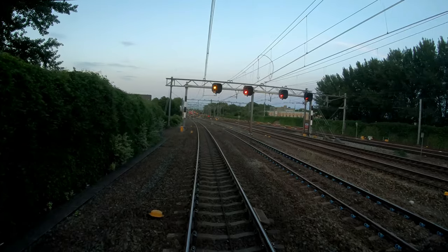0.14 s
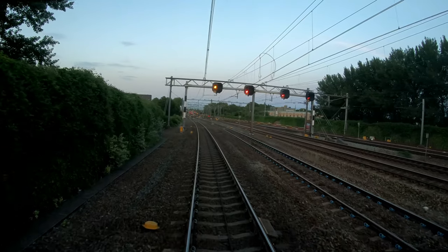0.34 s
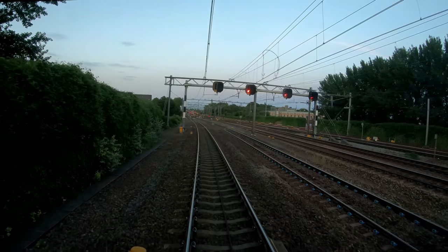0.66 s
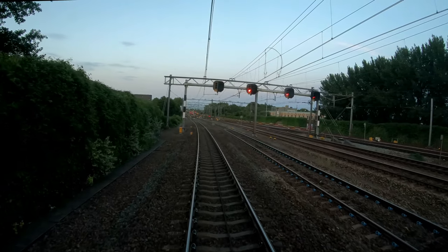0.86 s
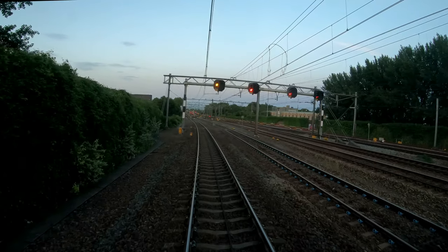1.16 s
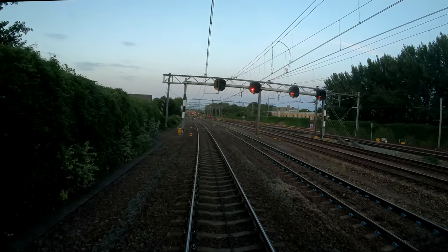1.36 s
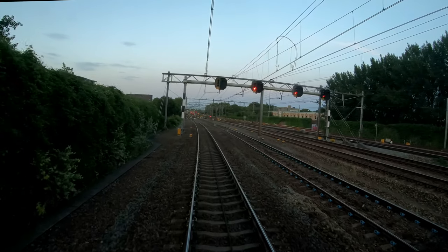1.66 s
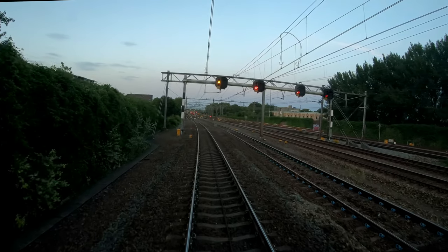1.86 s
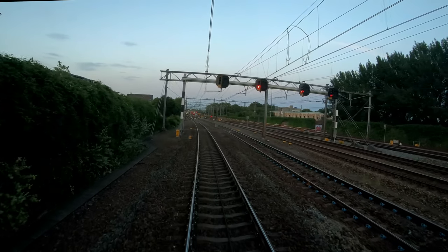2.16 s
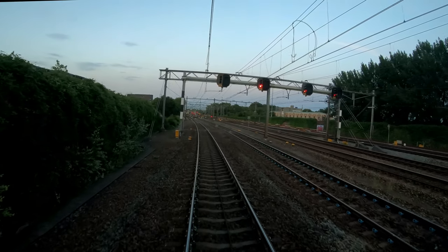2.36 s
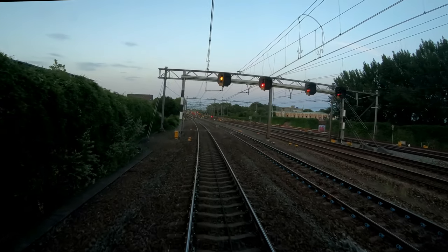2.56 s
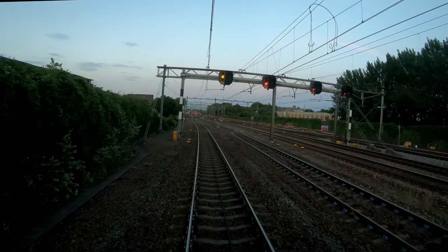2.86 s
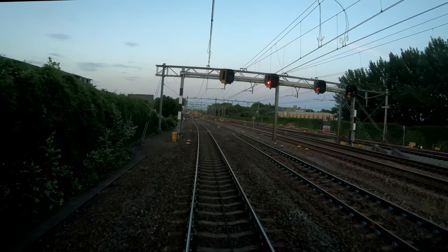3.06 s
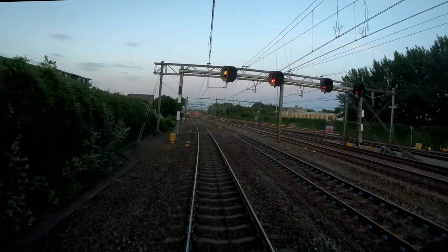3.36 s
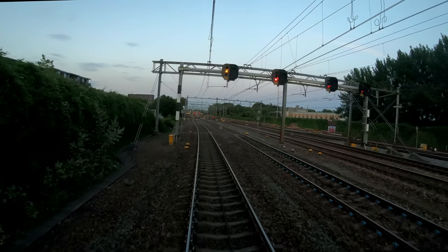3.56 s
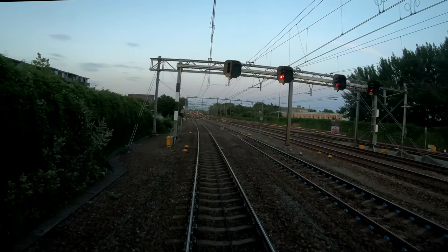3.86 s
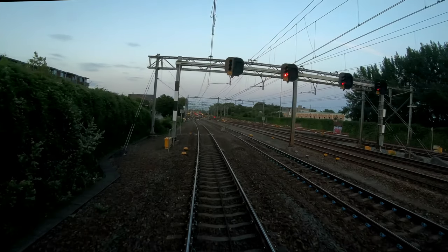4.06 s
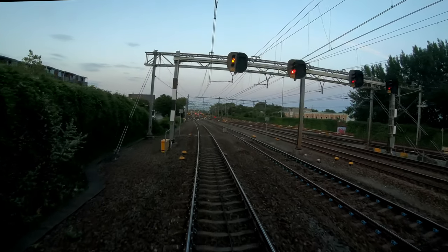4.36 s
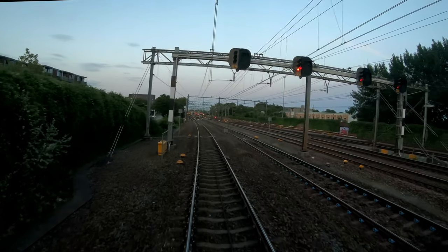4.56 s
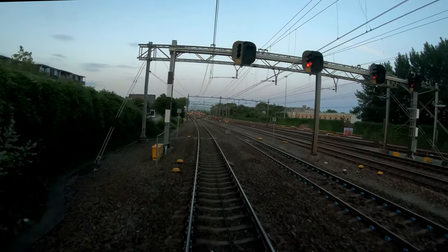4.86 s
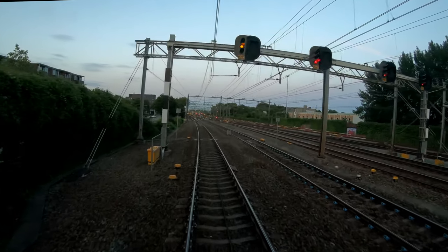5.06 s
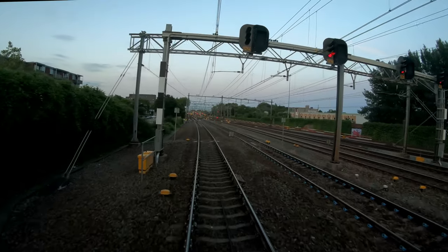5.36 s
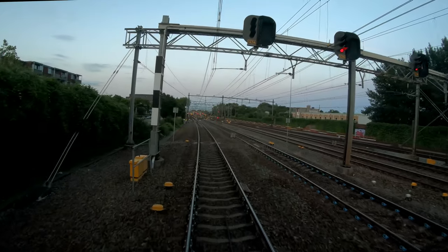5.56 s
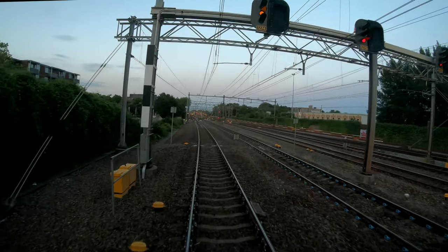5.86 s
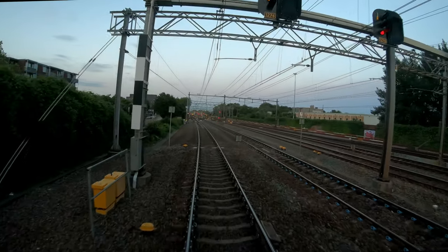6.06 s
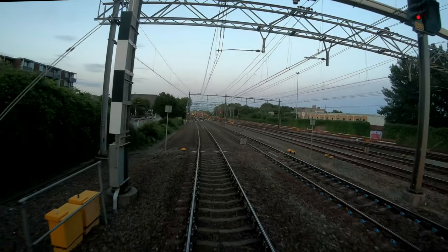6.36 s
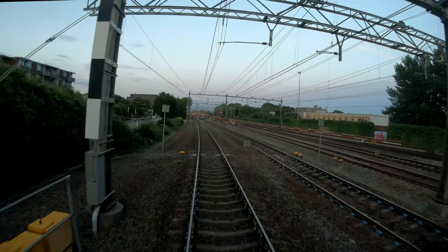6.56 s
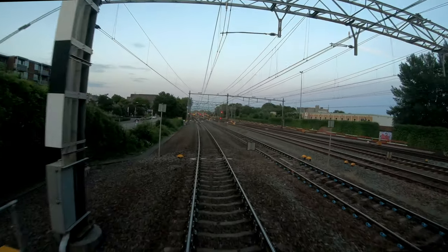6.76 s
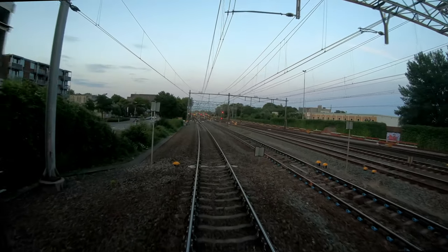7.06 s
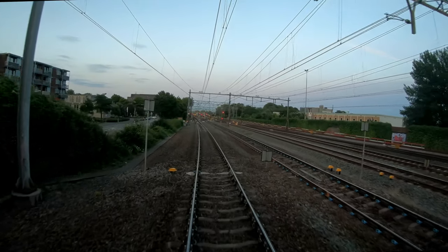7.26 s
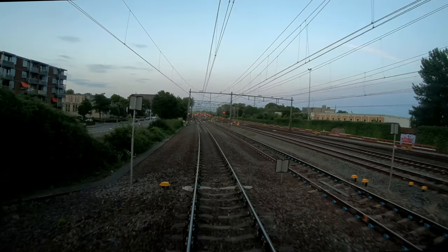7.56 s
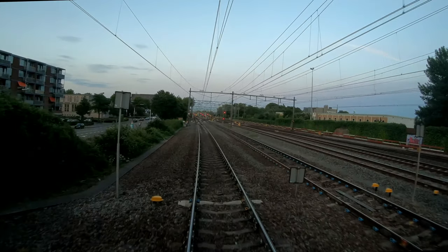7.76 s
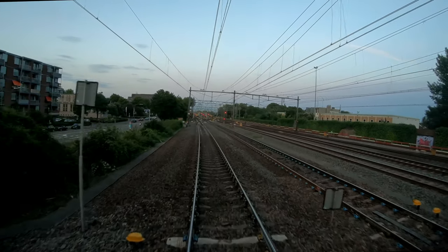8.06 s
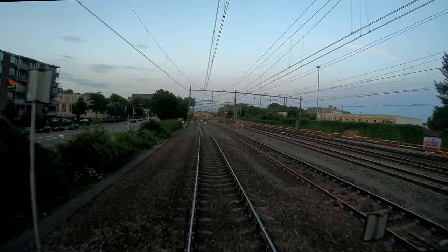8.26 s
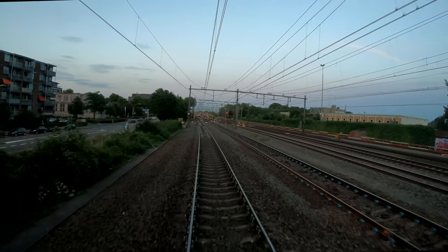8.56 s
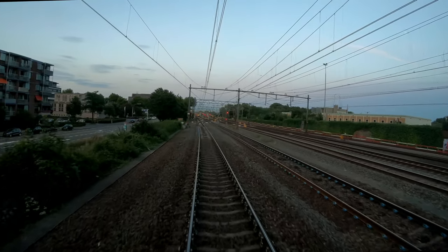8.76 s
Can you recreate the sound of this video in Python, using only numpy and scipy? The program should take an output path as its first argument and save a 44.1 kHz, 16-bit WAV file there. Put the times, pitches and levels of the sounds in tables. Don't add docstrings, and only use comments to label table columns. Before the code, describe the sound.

Close stereo inside a moving train's cab: a deep, wavering rumble with boomy lurches runs throughout. Early on, compressed air blows off twice, the second sharper, with a faint metallic ring and tiny squeaks, followed by four very quiet whistling puffs. The rolling then strengthens gradually, with frequent low bumps, brief panel hums, faint rising gear tones, a steady thin whine, tiny clicks and a heavy soft thud near the end.

```python
import sys
import numpy as np
from scipy import signal
from scipy.fft import rfft, irfft, next_fast_len
from scipy.io import wavfile
from scipy.ndimage import uniform_filter1d

SR = 44100
rng = np.random.default_rng(int(sys.argv[2]) if len(sys.argv) > 2 else 0)


def unload_wav(signal):
    wavfile.write(
        sys.argv[1],
        SR,
        np.round(np.clip(np.atleast_2d(signal).T, -1, 1) * 32767).astype(np.int16),
    )


def how_loud(loudness_db):
    steps = np.asarray(loudness_db, float) / 20
    return 10 ** steps


N = 393372
T = np.arange(N) / SR
SLOW = T[::64]
HZ = np.maximum(np.fft.rfftfreq(next_fast_len(N), 1 / SR), 1)
MESH_HZ = 179.2 + 24.4 * T
DOUBLINGS = np.log2(MESH_HZ / 300)

# frequency_hz, density_db (per Hz)
RUMBLE = [(8.8, -58.5), (15, -26.5), (47, -6), (65, 4.5), (76, -4), (91, -9), (114, -6), (149, -9.5),
          (170, -17), (191, -13), (215, -19), (258, -21), (298, -35), (340, -34), (440, -65.5), (750, -120)]
# frequency_hz, width_hz, lift_db
RUMBLE_PEAKS = [(88.3, 4.2, -7.5), (93.8, 8.5, 3.5), (112.4, 10, 5), (122.1, 9.2, -4), (151.7, 7.3, 5),
                (184, 8.6, 3.5), (212.4, 11, 4.5), (277, 20, 4.5)]
# time_s, pitch_hz
SLEEPERS = [(0, 57.03), (.75, 62), (1.6, 53.7), (2.5, 50.35), (3.5, 58), (5.3, 63.63), (6.5, 67.84),
            (8.1, 65.81), (8.92, 68.76)]
# time_s, level_db
RAIL = [(0.0, -37.5), (0.52, -28.5), (0.74, -40), (1.49, -43.5), (2.85, -35), (3.53, -36.5), (3.72, -34),
        (4.94, -33), (5.17, -42.5), (5.42, -39), (5.54, -32.5), (6.04, -38.5), (6.21, -35), (6.56, -32.5),
        (6.9, -33), (7.18, -35), (7.53, -34.5), (8.92, -32)]
# peak_s, level_db, rise_s, fall_s
SURGES = [(0.433, -27.5, 0.06, 0.012), (0.535, -37, 0.03, 0.013), (0.713, -21.5, 0.031, 0.036),
          (0.954, -29.5, 0.052, 0.025), (1.211, -30, 0.053, 0.042), (1.919, -29.5, 0.026, 0.021),
          (2.35, -34, 0.038, 0.027), (2.779, -31.5, 0.021, 0.087), (3.651, -27, 0.022, 0.019),
          (3.801, -30.5, 0.03, 0.055), (4.231, -26, 0.04, 0.05), (4.339, -26, 0.028, 0.017),
          (4.462, -26.5, 0.045, 0.017), (4.586, -29, 0.03, 0.035), (4.746, -25.5, 0.036, 0.021),
          (4.922, -26.5, 0.014, 0.031), (5.026, -19, 0.025, 0.025), (5.375, -27.5, 0.02, 0.026),
          (5.556, -34.5, 0.043, 0.034), (5.773, -23.5, 0.028, 0.027), (6.094, -24, 0.063, 0.057),
          (6.613, -30.5, 0.037, 0.035), (6.773, -20, 0.021, 0.03), (7.081, -25, 0.055, 0.038),
          (7.325, -20.5, 0.023, 0.086), (7.641, -16.5, 0.034, 0.039), (7.748, -23, 0.038, 0.039),
          (8.151, -29.5, 0.067, 0.052), (8.339, -24, 0.014, 0.02), (8.639, -26.5, 0.013, 0.023)]
# peak_s, level_db, rise_s, fall_s
LURCHES = [(0.221, -42, 0.047, 0.044), (0.969, -35, 0.053, 0.14), (2.633, -36.5, 0.071, 0.065),
           (3.435, -36.5, 0.04, 0.042), (3.763, -39, 0.048, 0.041), (4.328, -36.5, 0.047, 0.04),
           (4.89, -36, 0.047, 0.045), (5.017, -36.5, 0.036, 0.038), (5.144, -37.5, 0.037, 0.047),
           (5.734, -36.5, 0.06, 0.055), (6.117, -41, 0.037, 0.039), (7.539, -31.5, 0.04, 0.047),
           (7.892, -38.5, 0.04, 0.043), (8.743, -39.5, 0.069, 0.041)]
# peak_s, rumble_lift_db, length_s
JOLTS = [(0.154, 3, 0.032), (0.395, 4, 0.034), (0.647, 6.5, 0.016), (2.298, 2.5, 0.064), (4.009, 2, 0.077),
         (4.663, 5, 0.053), (4.965, 2, 0.096), (5.454, 3.5, 0.044), (6.603, -2.5, 0.041), (6.855, 2, 0.049),
         (7.97, -4.5, 0.057), (8.079, 4.5, 0.024), (8.36, 1.5, 0.044), (8.71, 7, 0.038)]


def rumble():
    sleeper_hz = np.interp(T, *np.transpose(SLEEPERS))
    rail_db = np.interp(T, *np.transpose(RAIL))
    rough_db = rail_db + 36.5
    jolt_db = np.interp(T, SLOW, sum(db * swell(s, long, long) for s, db, long in JOLTS))
    low = field(RUMBLE, RUMBLE_PEAKS)

    pumping = np.sqrt(how_loud(1 + rail_db + 1.3 * walk(9)) ** 2 + bumps_power(SURGES))
    boom = 0.75 * tone(sleeper_hz * (1 + 0.0503 * walk(9)))
    boom = boom + 0.65 * part(low, 50, 80, even=0.95)

    sway_db = -42 + 0.2 * rough_db + 3.2 * walk(10)
    sway_gain = np.sqrt(how_loud(sway_db) ** 2 + bumps_power(LURCHES))
    sway = sway_gain * part(low, 5, 45, even=1.0)

    floor_db = -33 + 1.5 * DOUBLINGS + 0.042 * rough_db + jolt_db + 1.0 * walk(8)
    return sway + pumping * boom + how_loud(floor_db) * part(low, 85, 300, even=0.11)


# frequency_hz, density_db (per Hz)
ROAR = [(180, -31), (300, 0), (348, -5.5), (386, -2.5), (511, -8), (620, -8), (668, -17), (698, -14),
        (752, -16), (798, -16), (1320, -22.5), (1720, -28.5), (4720, -45.5), (7250, -49), (10400, -60),
        (13500, -93), (22000, -120)]
# frequency_hz, width_hz, lift_db
ROAR_PEAKS = [(384.1, 8.4, -5), (1760, 56, -6.5), (1073, 21, 5.5), (393.7, 43, 5), (470.6, 56, 5),
              (639, 54, 4.5), (710, 24, 1.5), (890, 8.3, 1), (1309, 110, 4.5), (1390, 90, 0.5),
              (7425, 490, 3), (9750, 290, -10.5)]
# frequency_hz, gain_db (as the speed doubles)
SPEED_UP = [(300, 2.5), (700, 0), (1200, 6.5), (2500, 8.5), (4000, -2), (11000, -2)]


def roar():
    high, heave = field(ROAR, ROAR_PEAKS), walk(2.8)
    edges_hz = 300 * 2 ** np.arange(0, 6, .75)
    bands = []
    for low_hz, high_hz in zip(edges_hz, edges_hz[1:]):
        inside = (HZ >= low_hz) & (HZ < high_hz)
        bands.append(irfft(high * inside, next_fast_len(N))[:, :N])
    scale = how_loud(-52.5) / sum(bands[:3]).mean(0).std()
    out = 0
    for hz, band in zip(edges_hz, bands):
        gain_db = np.interp(1.3 * hz, *np.transpose(SPEED_UP))
        flicker_db = min(1500 / hz, 1) * (0.3 * heave + 1.0 * walk(8))
        out = out + band * scale * how_loud(gain_db * DOUBLINGS + flicker_db)
    return out


# frequency_hz, density_db (per Hz)
FIRST_AIR = [(120, -33.5), (200, 0), (292, 1.5), (442, -11.5), (566, -1.5), (827, -10), (929, -9),
             (1290, -17.5), (1990, -17.5), (2810, -22.5), (4690, -34), (7080, -19.5), (10400, -40.5),
             (13500, -75), (22000, -120)]
SECOND_AIR = [(120, -34.5), (200, 0), (288, -12.5), (387, -5.5), (560, -11.5), (657, -3.5), (749, -10.5),
              (1290, -10.5), (1380, -9), (2340, -9), (4840, -29), (7560, -26), (10400, -43.5), (13500, -75),
              (22000, -120)]
# frequency_hz, width_hz, lift_db
FIRST_PEAKS = [(557, 74, 6.5), (689.5, 44, 3.5), (938, 39, 8.5), (1215, 26, 5), (1570, 40, 7),
               (1782, 36, 5), (2010, 101, 5), (2215, 28, 5), (2843, 71, 5), (3215, 47, 5), (3810, 23, 4),
               (4098, 41, 5.5), (7240, 200, 2), (10810, 870, -12), (14510, 6500, 19)]
SECOND_PEAKS = [(410, 42, 6), (682, 50, 5), (890, 20, 6.5), (1018, 36, 6.5), (1210, 45, 4.5), (1342, 26, 7),
                (1750, 46, 7), (1930, 35, 7), (2050, 34, 4.5), (2300, 61.2, 4.5), (2565, 30, 3),
                (2845, 25, 7.5), (3464, 38, 4), (3890, 43, 8.5), (7670, 150, 2.5), (10780, 910, -12.5),
                (14480, 8800, 21)]
# open_s, peak_db, crack_db (under the peak), swell_s, shut_s (both after opening)
FIRST = [
    (.114, -61.5, -2.5, 0.032, .19),
    (.306, -27, -13.5, 0.055, 0.069),
]
SECOND = [
    (.613, -24.5, -3.5, .024, 0.039),
    (.665, -32.5, -6, .032, 0.03),
]


def blasts():
    first = blast(FIRST, FIRST_AIR, FIRST_PEAKS, jet_db=-4.5, jet_lag=.1, edge_db=-19.5,
                  hiss_db=-18, hiss_lag_db=3, fizz_db=-43.5)
    second = blast(SECOND, SECOND_AIR, SECOND_PEAKS, jet_db=0, jet_lag=0.59, edge_db=-14.5,
                   hiss_db=-17.5, hiss_lag_db=-8.5, fizz_db=-47.5)
    return (first + second) * how_loud(1.2 * walk(220))


# frequency_hz, difference_db
VALVE_PORTS = [
    [(60, -23), (110, -18.5), (190, -19.5), (330, -13.5), (580, -8.5), (1020, 0.5), (1800, -3.5), (3180, -5.5), (5610, 0), (9900, -0.5)],
    [(60, 0.0), (110, -0.5), (190, -1), (330, 2.5), (580, 1.5), (1020, -1.5), (1800, -2), (3180, 0), (5610, 2), (9900, -2)],
]


def blast(rows, colour, peaks, jet_db, jet_lag, edge_db, hiss_db, hiss_lag_db, fizz_db):
    spectra = field(colour, peaks, *VALVE_PORTS)
    body = part(spectra, 235, 1109.7)
    jet = part(spectra, 1202, 4400) * how_loud(.8 * walk(90))
    jet = jet + how_loud(edge_db) * part(spectra, 2480, 4400)
    hiss = part(spectra, 4600, 10400)
    fizz = part(spectra, 10520, 16000)
    out = 0
    for s, db, crack_db, swell_s, shut_s in rows:
        age = T - s
        shape_db = blow_db(age, crack_db, swell_s, shut_s, sag=49.5, fall=228)
        jet_gain = how_loud(jet_db + jet_lag * shape_db * (age < swell_s))
        hiss_gain = how_loud(hiss_db + hiss_lag_db * np.clip(1 - age / 0.035, 0, 1))
        out = out + how_loud(db + shape_db) * (body + jet_gain * jet + hiss_gain * hiss)
        follows = np.where((T > s) & (age < shut_s), .3, 1)
        out = out + how_loud(db + fizz_db + shape_db * follows) * fizz
    return out


# open_s, whistle_db, air_db
PUFFS = [
    (.888, -58, -52.5),
    (1.038, -57, -52),
    (1.161, -56, -51),
    (1.341, -54, -50),
]
# frequency_hz, density_db (per Hz)
PUFF = [(450, -30), (680, -4), (800, -10), (1000, -11), (1350, -21), (1550, -11), (2300, -14), (2600, -22),
        (3700, -27), (5000, -44), (9000, -47)]
# frequency_hz, width_hz, lift_db
PUFF_PEAKS = [(1780, 120, 5), (1960, 110, 3), (2060, 90, 5), (2234, 120, 2), (2920, 80, 1.5)]


def puffs():
    air = part(field(PUFF, PUFF_PEAKS, *VALVE_PORTS), 500, 9000)
    wobble, flutter_db = 1 + .007 * walk(160), 1.6 * walk(200)
    out = 0
    for start, whistle_db, air_db in PUFFS:
        age = T - start
        whistle = tone(1720 * wobble + 380 * np.exp(-np.abs(age) / .014))
        whistle_shape_db = blow_db(age, -2.5, 0.02, 0.071, sag=71.5, fall=801)
        air_shape_db = blow_db(age, -5.5, 0.021, 0.071, sag=188.5, fall=228)
        out = out + how_loud(whistle_db + flutter_db + whistle_shape_db) * whistle
        out = out + how_loud(air_db + air_shape_db) * air
    return out


# frequency_hz, level_db, t60_s, extra_s (rings on after the stop)
RING = [
    (1222, -67, 2.2, .28),
    (2213, -55, 1.1, 0),
    (549, -62, 2.0, 0),
    (3865, -77, 1.4, 0),
    (5733, -80, 1.2, 0),
]


def ring():
    start_s, stop_s = .36, .64
    age = np.maximum(T - start_s, 0)
    out = 0
    for hz, db, t60, more in RING:
        gate = uniform_filter1d(1. * ((age > 0) & (T < stop_s + more)), 400)
        level = how_loud(db - 60 * age / t60 + 1.1 * walk(45))
        out = out + gate * level * tone(hz * (1 + .002 * walk(60)))
    return out


# peak_s, pitch_hz, level_db, rise_s, fall_s
PIPE_NOTES = [(.326, 2025, -44.5, 0.0094, .014), (.325, 690, -40.5, .01, 0.01),
              (.375, 960, -40.5, 0.012, .035), (0.37, 1800, -45, 0.017, .02),
              (0.383, 280, -39, 0.027, 0.017), (.43, 1800, -51, .012, 0.017), (.638, 1720, -33, .007, .028),
              (.652, 890, -35, .009, .012), (.634, 1018, -36, .006, .018), (.665, 2830, -38, 0.011, .02),
              (.64, 3480, -41, .007, .025), (.65, 3860, -42, .01, 0.026), (.697, 1362, -34.5, .015, 0.024),
              (.697, 1928, -34.5, .014, 0.0136), (.69, 2350, -33.5, .02, 0.016),
              (.71, 480, -38.5, .02, 0.041), (.73, 1190, -41.5, .015, .02), (.75, 1932, -41, .015, 0.017),
              (.79, 1370, -53, .015, .015)]


def pipes():
    pan = how_loud(np.array([[0.2], [-0.2]]))
    return pan * how_loud(2.6 * walk(150)) * notes(PIPE_NOTES, 1 + .006 * walk(130))


# peak_s, level_db, length_s
SQUEAKS = [
    (.742, -66, 0.012),
    (.787, -70, 0.012),
]


def squeaks():
    level = np.sqrt(bumps_power([(s, db, long, long) for s, db, long in SQUEAKS]))
    return level * how_loud(3.0 * walk(150)) * tone(5725 * (1 + .006 * walk(140)))


# peak_s, level_db, rise_s, fall_s, thud_db
JOINTS = [
    (5.02, -52.5, 0.04, .05, -46),
    (5.45, -55, 0.047, 0.072, -44),
    (6.801, -64.5, 0.05, 0.044, -41.5),
    (7.39, -49.5, 0.05, 0.066, -51.5),
    (8.31, -58, 0.04, 0.04, -56),
    (8.42, -49.5, 0.06, 0.056, -53.5),
    (8.69, -45, 0.057, 0.07, -20.5),
]
# frequency_hz, density_db (per Hz)
JOINT = [(250, -6), (500, -13.5), (1000, -27), (2500, -44), (5000, -60.5), (8000, -59), (10500, -85.5)]
# frequency_hz, width_hz, lift_db
JOINT_PEAKS = [(2450, 400, 6.5), (1450, 200, 3), (7200, 900, 3)]


def joints():
    noise = part(field(JOINT, JOINT_PEAKS), 230, 11000)
    floor = tone(93 * (1 + 0.02745 * walk(17)))
    out = 0
    for s, db, rise, fall, thud_db in JOINTS:
        shape = np.exp(-((T - s) / np.where(T < s, rise, fall)) ** 2)
        out = out + shape * (how_loud(db) * noise + how_loud(thud_db) * shape * floor)
    return out


# peak_s, pitch_hz, level_db, rise_s, fall_s
FLOOR_NOTES = [(.8, 112, -34, 0.027, 0.033), (1.18, 192, -38.5, 0.027, 0.04),
               (1.28, 115, -36.5, 0.032, 0.034), (1.77, 215, -44.5, 0.037, .04),
               (2.22, 140, -39.5, .02, 0.026), (2.33, 190, -41, .03, 0.043),
               (3.3, 140, -38.5, 0.042, 0.037), (3.76, 102, -39, .03, .03),
               (4.03, 110, -34.5, 0.042, 0.073), (4.3, 110, -36, 0.042, 0.055),
               (4.64, 180, -40.5, .03, .03), (5.45, 113, -32.5, .04, 0.038), (5.45, 182, -40, .04, .03),
               (5.8, 140, -39, 0.033, 0.047), (6.15, 185, -35, .03, .03), (6.18, 110, -37, .04, 0.034),
               (6.45, 108, -37, 0.07, 0.043), (6.47, 185, -40.5, .03, 0.033), (7.15, 140, -36, 0.049, .04),
               (8.08, 115, -36, .03, .03), (8.36, 100, -35.5, .03, 0.049), (8.37, 185, -39.5, 0.027, .03),
               (8.74, 195, -35.5, 0.033, 0.032), (8.7, 255, -41, .04, 0.047)]
# peak_s, level_db, rise_s, fall_s
PANEL_RINGS = [
    (2.45, -41.5, .05, .05),
    (2.9, -37, 0.11, 0.14),
]


def panels():
    hum = np.sqrt(bumps_power(PANEL_RINGS)) * tone(150.5 * (1 + 0.01007 * walk(6.2)))
    return hum + notes(FLOOR_NOTES, 1 + .015 * walk(15))


# centre_hz, half_width_hz, level_db
MESH_SINGS = [(243.2, 2.67, -42), (253.5, 4.1, -46), (383, 5, -53), (394, 4.5, -53)]
SECOND_SINGS = [(152.5, 8, -60.5), (280.7, 13, -55)]


def gears():
    return gear(MESH_HZ, MESH_SINGS) + gear(.865 * MESH_HZ, SECOND_SINGS)


def gear(hz, sings):
    loud = how_loud(-69)
    for centre, half, db in sings:
        loud = loud + how_loud(db) * np.exp(-((hz - centre) / half) ** 4)
    uneven = how_loud(1.5 * walk(10) + 3 * walk(30))
    return loud * uneven * tone(hz * (1 + .004 * walk(9) + .012 * walk(40)))


# frequency_hz, level_db
WHINE = [(888.2, -76), (2256, -89), (2466, -89.5), (2643, -93), (2875, -99), (3698, -100), (4107, -96),
         (4517, -105), (6982, -108)]


def converter():
    out = 0
    for hz, db in WHINE + [(10244, -113)]:
        out = out + how_loud(db - 0.5 + 1.3 * walk(2.9)) * tone(hz * (1 + 0.00073 * walk(2.7)))
    return out


# peak_s, level_db
TICKS = [
    (2.9, -88),
    (4.93, -80),
    (5.61, -81),
    (5.625, -82),
    (5.645, -83.5),
    (7.4, -83),
    (8.4, -82),
    (8.69, -81.5),
]


def trim():
    ticks = sum(how_loud(db) * np.exp(-np.abs(T - s) / np.where(T < s, .002, .015)) for s, db in TICKS)
    return ticks * part(field([(4000, 0.004), (9000, 0.0069)]), 4800, 8000)


# start_s, level_db
CLICKS = [(2.8757, -91.5), (3.7338, -89), (3.9044, -90), (4.009, -86.5), (4.096, -86.5), (4.3364, -87),
          (4.8482, -92), (4.9041, -87.5), (5.2852, -93), (5.4533, -91), (5.6828, -87.5), (5.7577, -88),
          (6.3144, -94.5), (6.7524, -86.5), (7.299, -92.5), (7.603, -84), (7.9337, -96), (8.3228, -86),
          (8.6216, -89), (8.7668, -87)]


def clicks():
    shape = sum(how_loud(db + 8) * (T > s) * np.exp(-np.abs(T - s) / .003) for s, db in CLICKS)
    return shape * part(field([(4000, 0.0027), (13000, 0.002)]), 6000, 11600)


def blow_db(age, crack_db, swell_s, shut_s, sag, fall):
    low_db = -sag * (shut_s - swell_s)
    times_s = [0, .009, swell_s, shut_s, shut_s + 1]
    return np.interp(age, times_s, [-30, crack_db, 0, low_db, low_db - fall], left=-200)


def swell(s, rise, fall):
    return np.exp(-((SLOW - s) / np.where(SLOW < s, rise, fall)) ** 2 / 2)


def bumps_power(rows):
    power = sum((how_loud(db) * swell(s, rise, fall)) ** 2 for s, db, rise, fall in rows)
    return np.interp(T, SLOW, power)


def notes(rows, wobble):
    out, turn = np.zeros(N), 2 * np.pi * np.cumsum(wobble) / SR
    for s, hz, db, rise, fall in rows:
        near = slice(max(int((s - 4 * rise) * SR), 0), int((s + 4 * fall) * SR))
        age = T[near] - s
        shape = np.exp(-(age / np.where(age < 0, rise, fall)) ** 2 / 2)
        wave = np.sin(hz * turn[near] + 2 * np.pi * rng.random())
        out[near] += np.sqrt(2) * how_loud(db) * shape * wave
    return out


def tone(hz):
    return np.sqrt(2) * np.sin(2 * np.pi * (np.cumsum(hz * np.ones(N)) / SR + rng.random()))


def walk(rate):
    k = int(SR / rate)
    held = np.repeat(rng.standard_normal(N // k + 1), k)
    return 1.311 * uniform_filter1d(uniform_filter1d(held, k), k)[:N]


def across(points):
    hz, value = np.transpose(points)
    return np.interp(np.log(HZ), np.log(np.maximum(hz, 1)), value)


# frequency_hz, side_minus_mid_db
PORTS = [(60, -20.5), (110, -24.5), (190, -20.5), (330, -9), (580, -5), (1020, 0.5), (1800, -1.5),
         (3180, -3.5), (5610, -1.5), (9900, -1.5)]
# frequency_hz, left_minus_right_db
TILT = [(60, 0.0), (110, -0.5), (190, 0.0), (330, 0.0), (580, 1.5), (1020, -1), (1800, -1.0), (3180, -0.5),
        (5610, -1.5), (9900, 1)]
# frequency_hz, share
LINKED = [(250, 0), (650, -.4), (950, .65), (1550, -.65), (3100, -.5), (4400, .2), (5300, .4), (9000, 0)]


def field(points, peaks=(), ports=PORTS, tilt=TILT):
    db = across(points)
    for hz, width, lift_db in peaks:
        db = db + lift_db / (1 + (2 * (HZ - hz) / width) ** 2)
    mid, side = rfft(rng.standard_normal((2, next_fast_len(N))))
    link = np.clip(across(LINKED), -.9, .9)
    side = np.sqrt(1 - link ** 2) * side + 1j * link * mid
    side, lean = side * how_loud(across(ports)), how_loud(across(tilt) / 2)
    return how_loud(db) * np.array([(mid + side) * lean, (mid - side) / lean])


def part(spectra, lo_hz, hi_hz, even=0.):
    edges = np.sqrt((1 + (lo_hz / HZ) ** 24) * (1 + (HZ / hi_hz) ** 24))
    x = irfft(spectra / edges, next_fast_len(N))[:, :N]
    x = x / x.mean(0).std()
    if even:
        power = uniform_filter1d(uniform_filter1d(x.mean(0) ** 2, 2000), 2000)
        x = x / (power + 0.046) ** (even / 2)
    return x / x.mean(0).std()


def scene():
    rolling = rumble() + roar()
    valve = blasts() + puffs() + ring() + pipes() + squeaks()
    shaken = joints() + panels() + trim() + clicks()
    machinery = gears() + converter()
    close = np.minimum((T[-1] - T) / .004 + .12, 1)
    opening_offset = -0.024 * np.exp(-T / 0.0018)
    return close * (rolling + valve + shaken + machinery) + opening_offset


def top_cut(x):
    return signal.sosfilt(signal.butter(12, 15800, fs=SR, output="sos"), x)


def record(dry):
    return top_cut(dry)


dry = scene()
out = record(dry)
unload_wav(out)
```